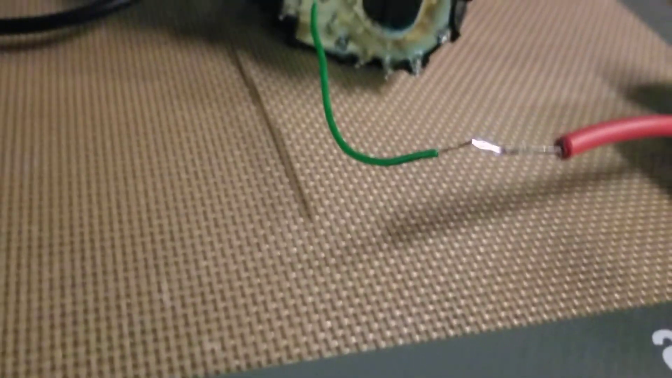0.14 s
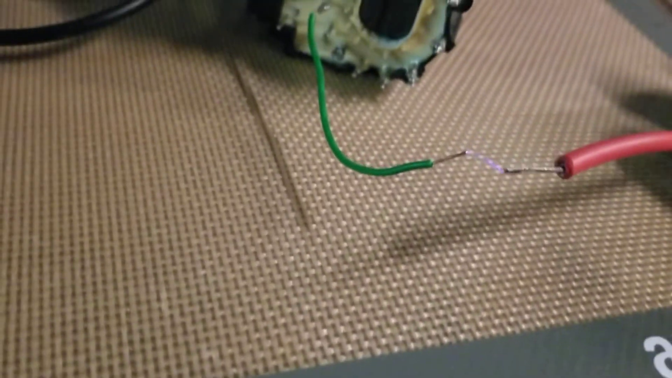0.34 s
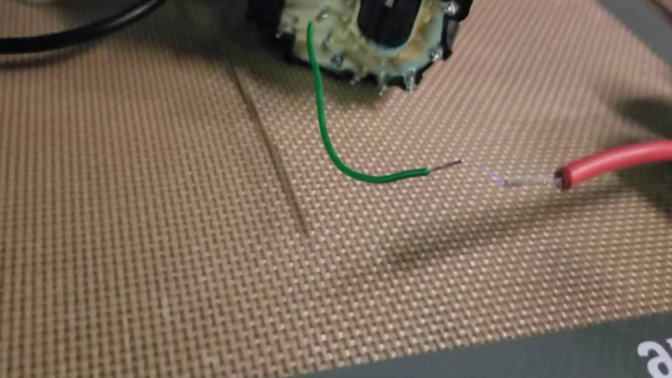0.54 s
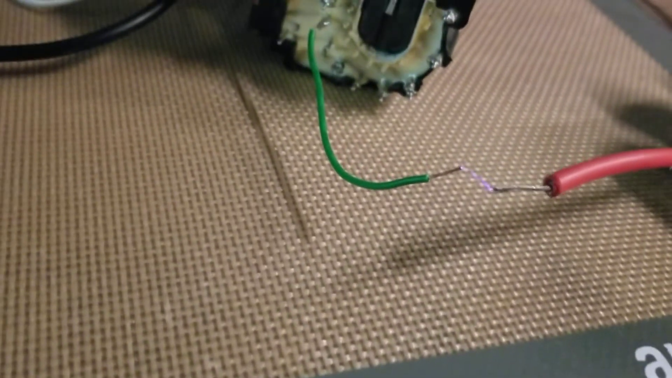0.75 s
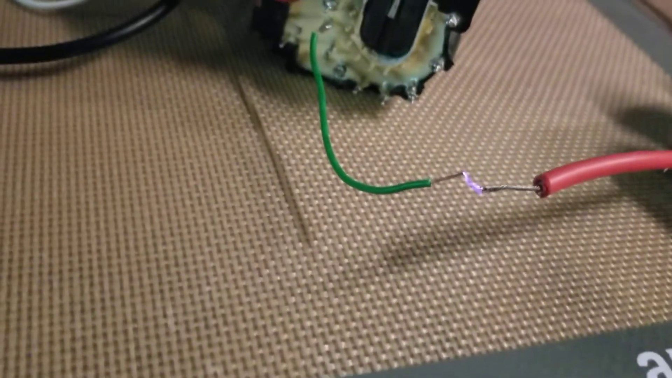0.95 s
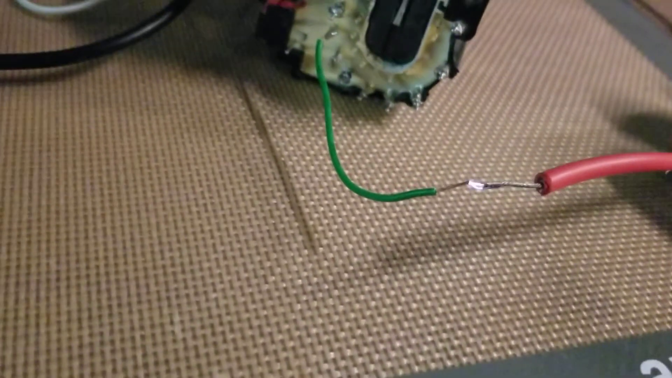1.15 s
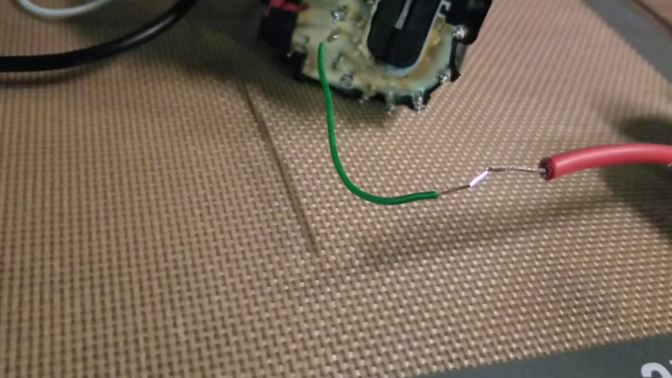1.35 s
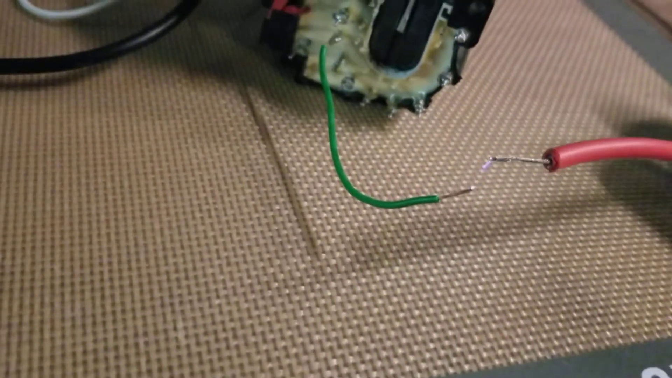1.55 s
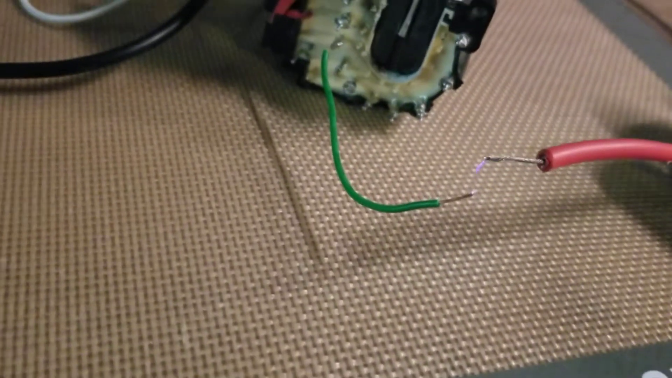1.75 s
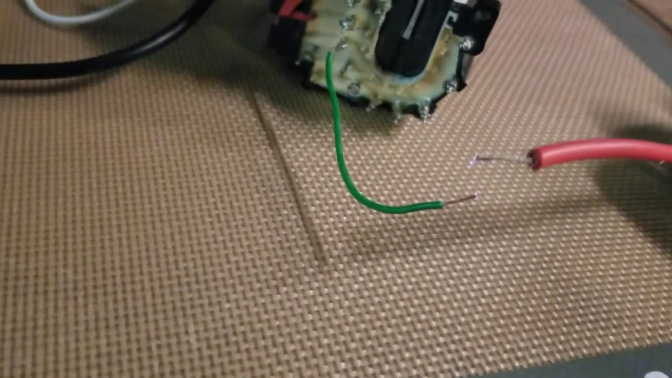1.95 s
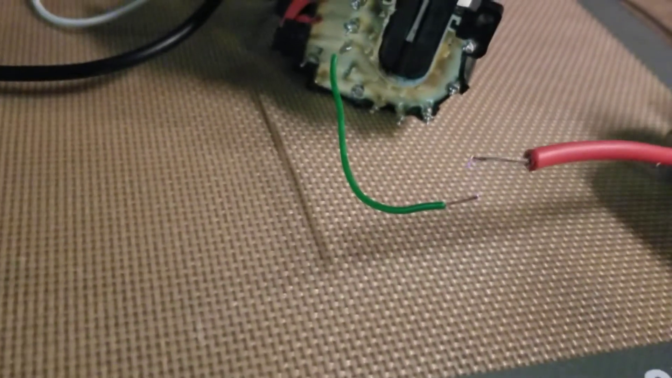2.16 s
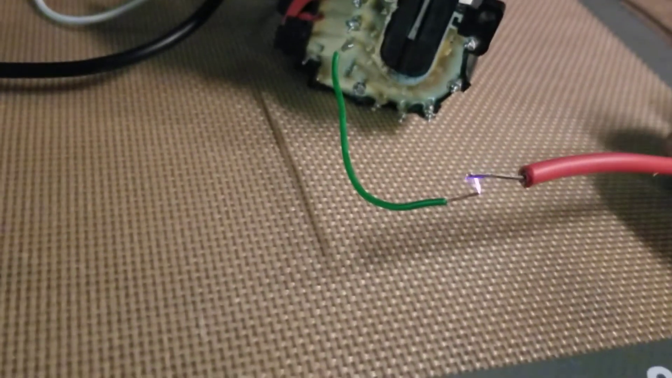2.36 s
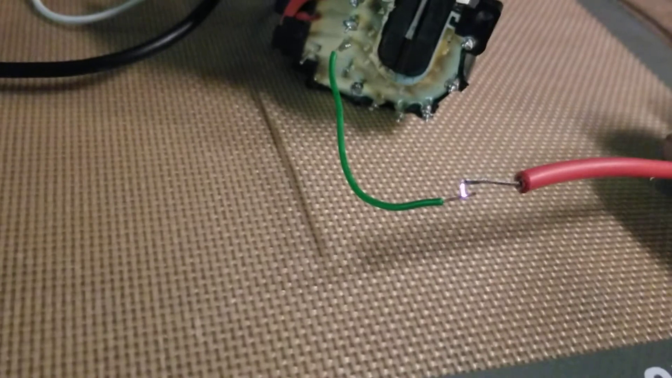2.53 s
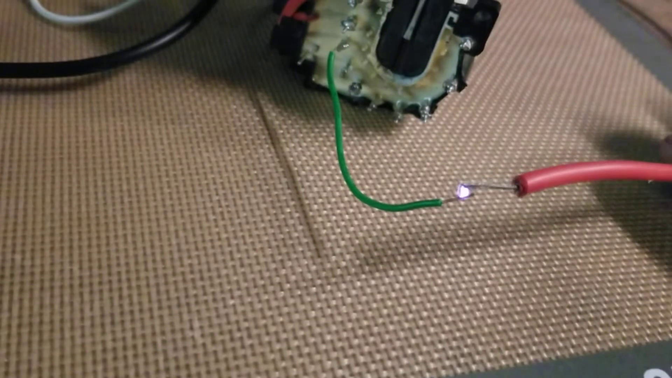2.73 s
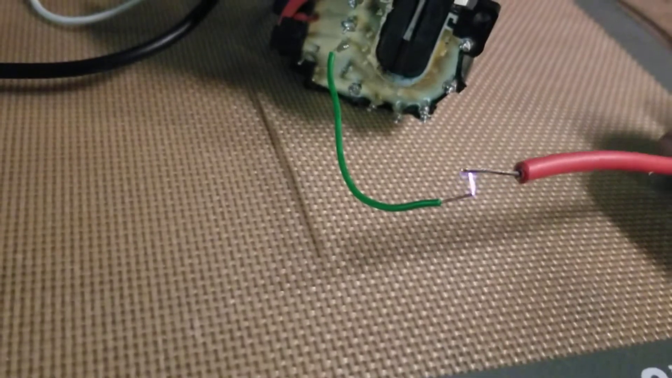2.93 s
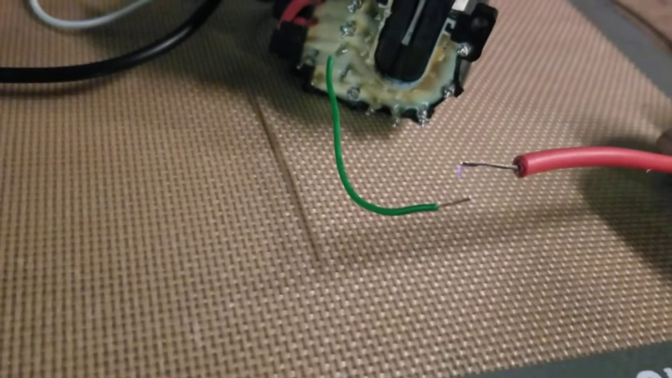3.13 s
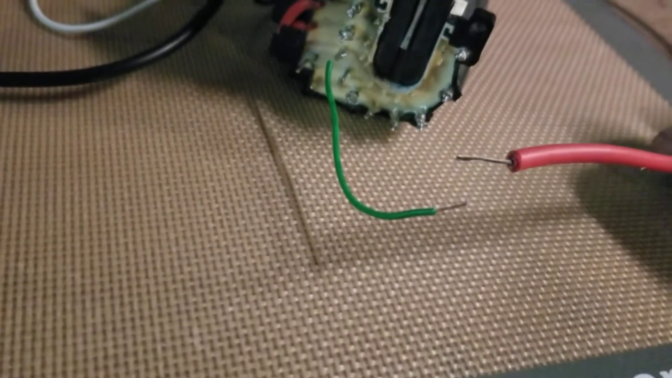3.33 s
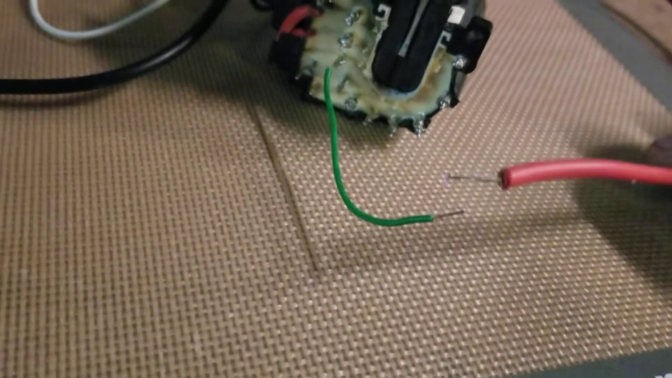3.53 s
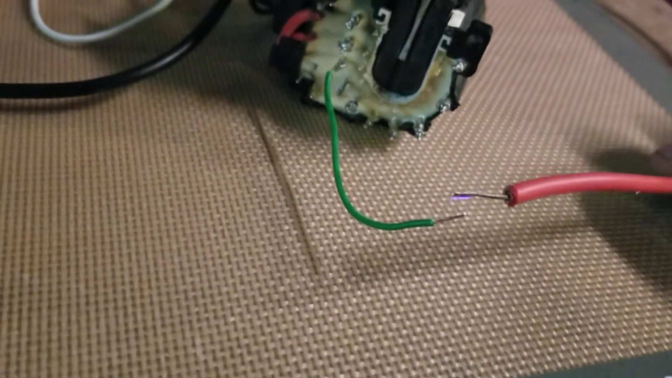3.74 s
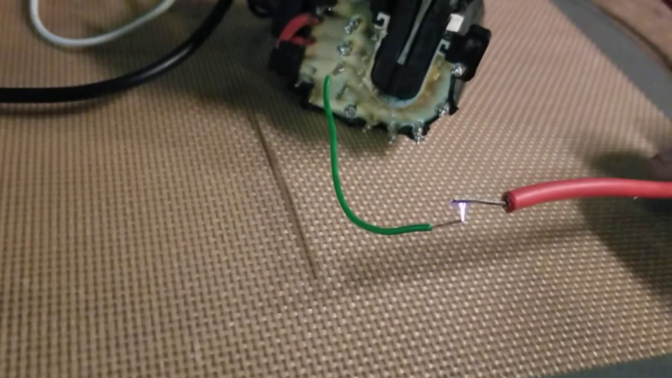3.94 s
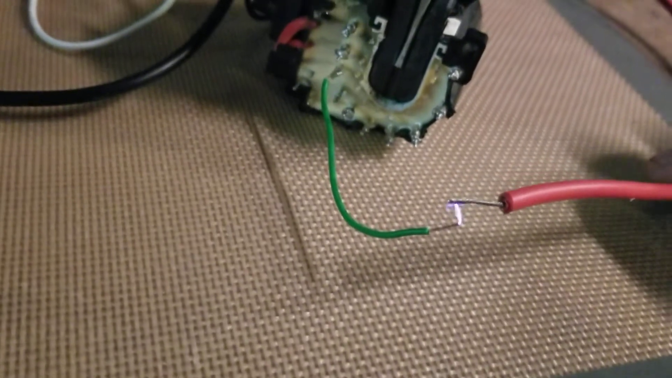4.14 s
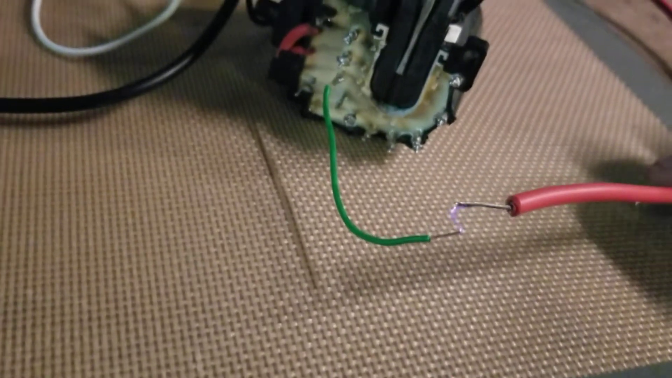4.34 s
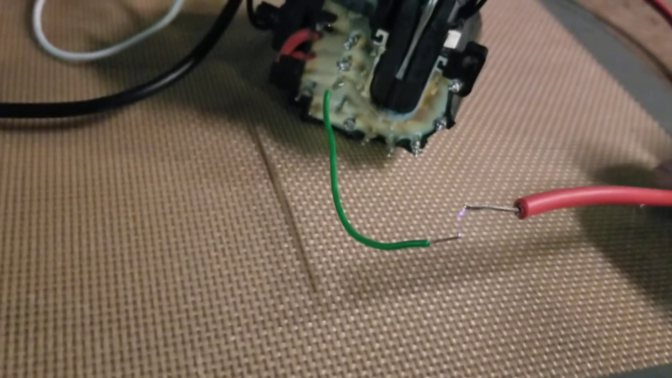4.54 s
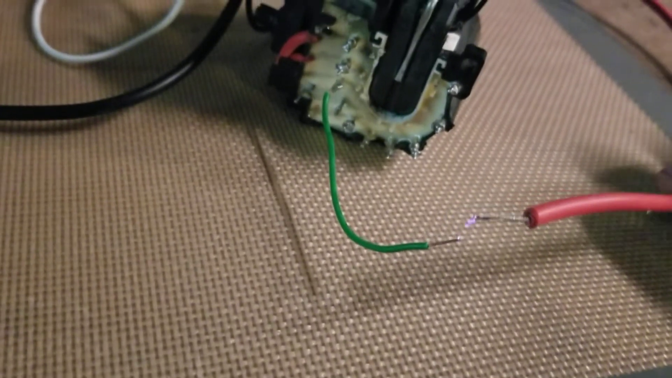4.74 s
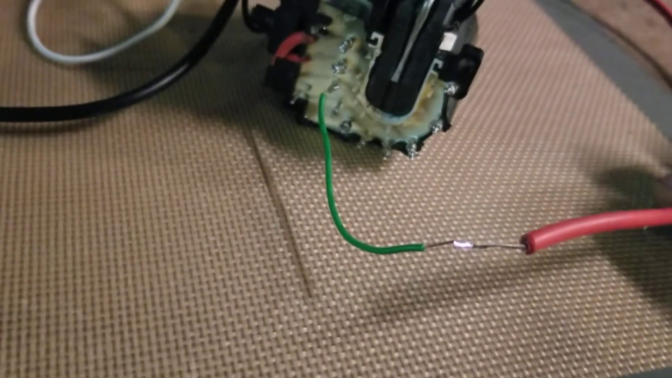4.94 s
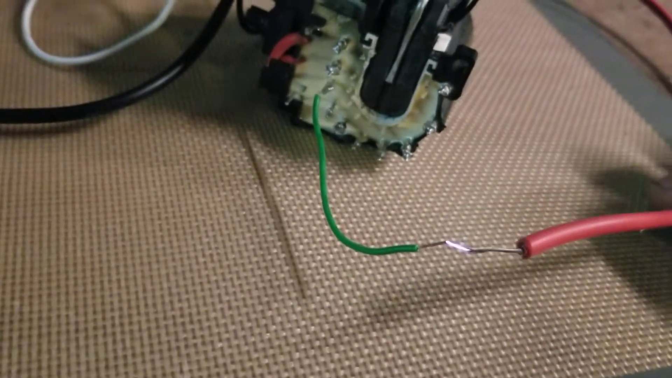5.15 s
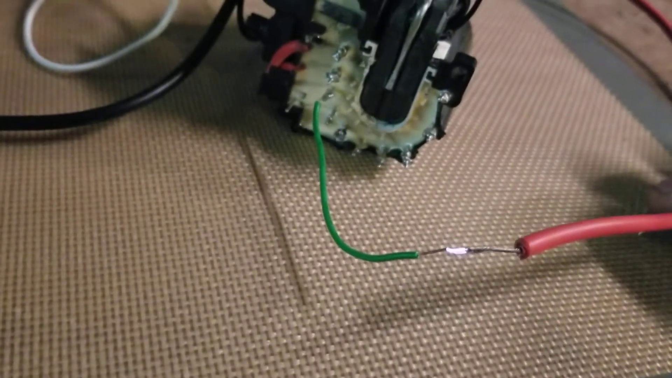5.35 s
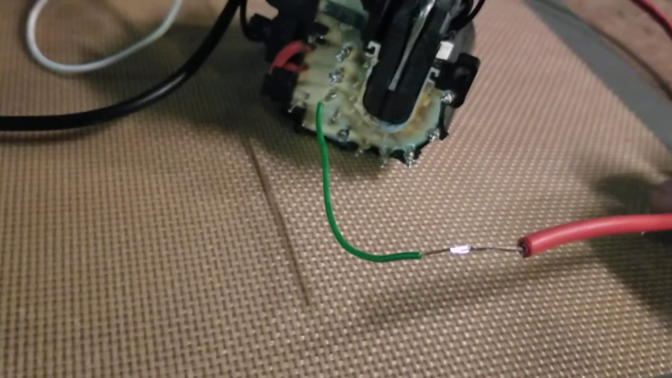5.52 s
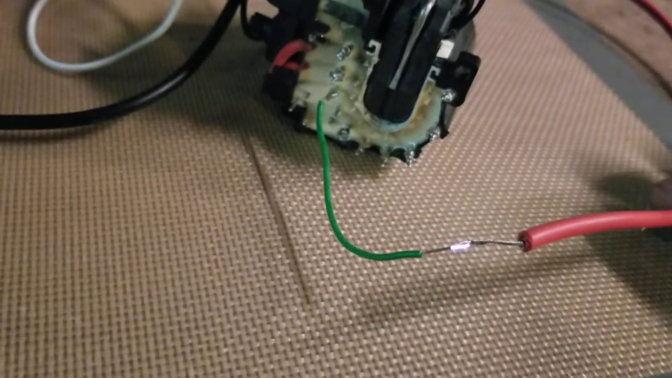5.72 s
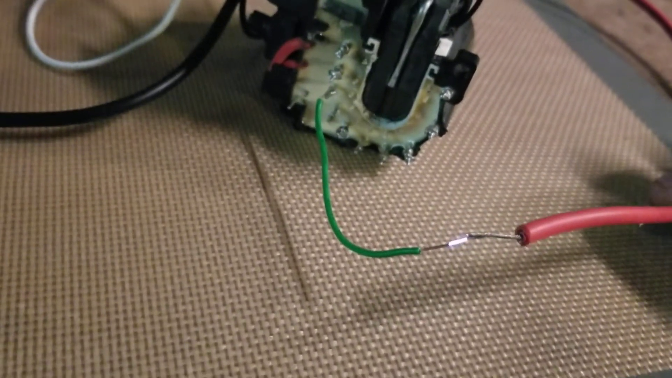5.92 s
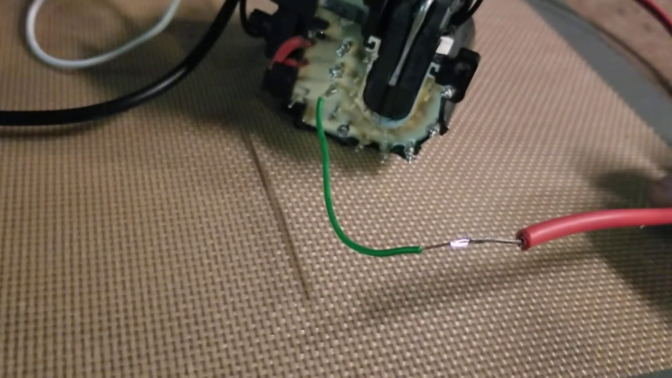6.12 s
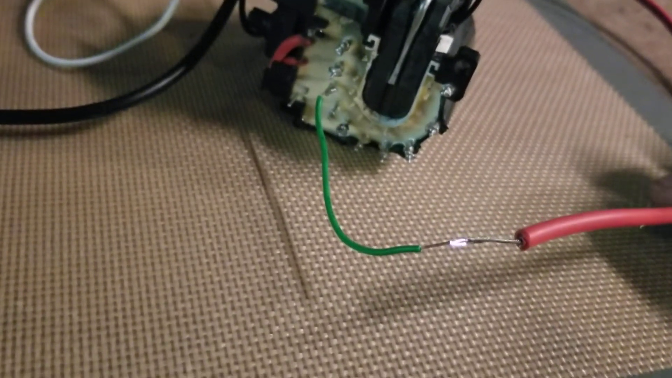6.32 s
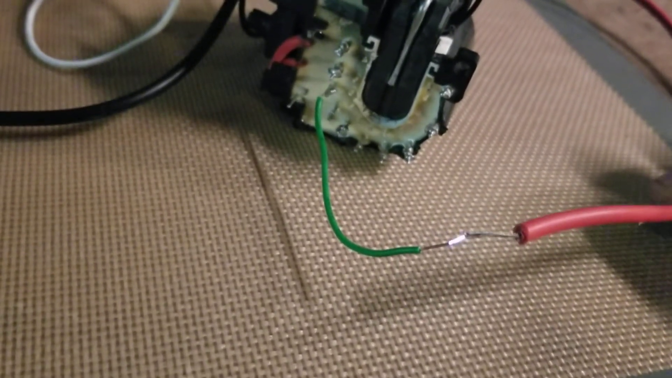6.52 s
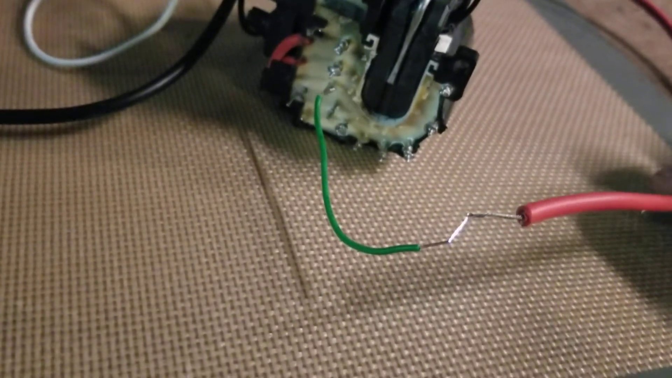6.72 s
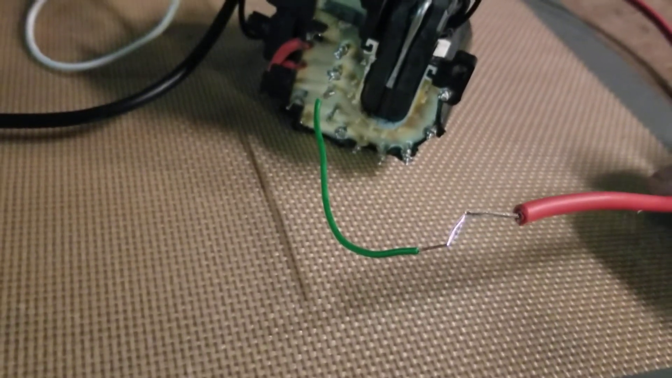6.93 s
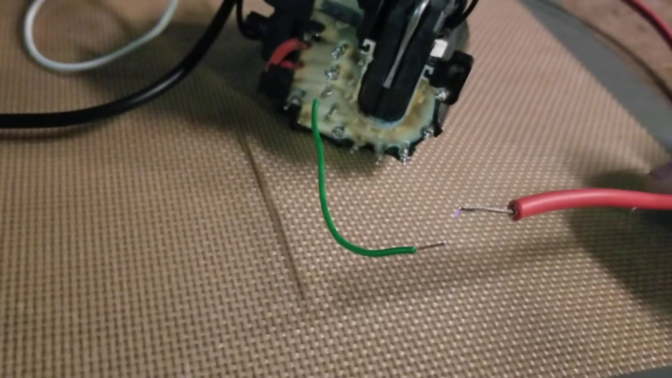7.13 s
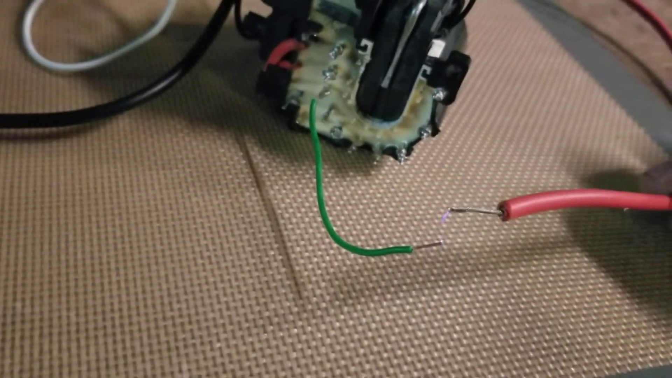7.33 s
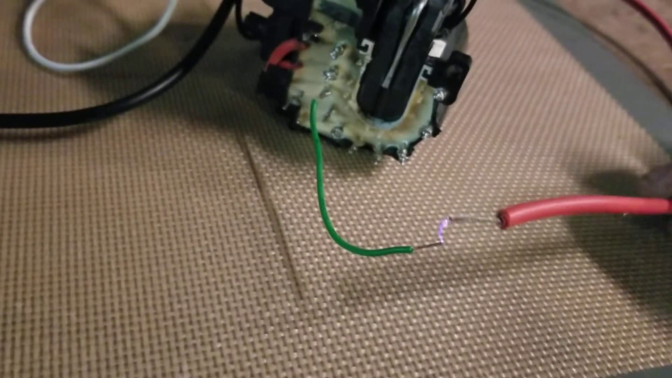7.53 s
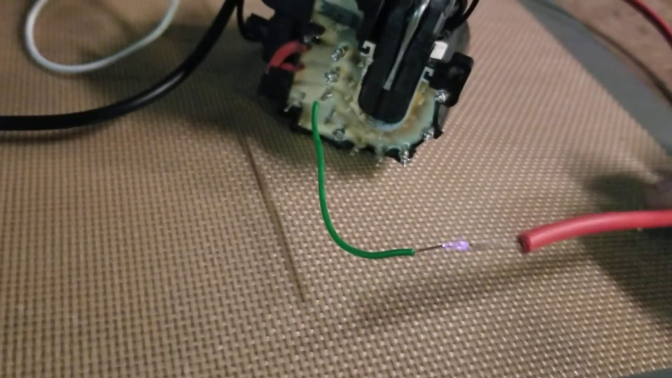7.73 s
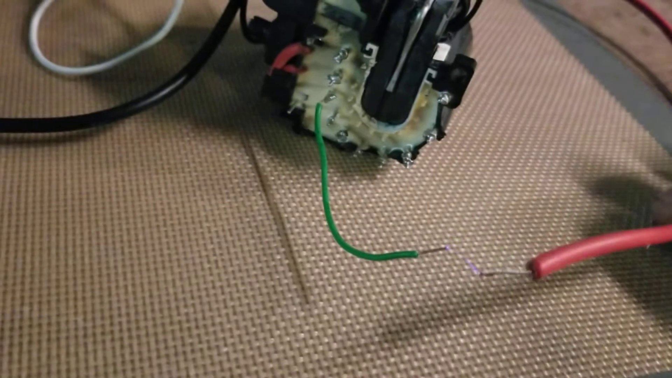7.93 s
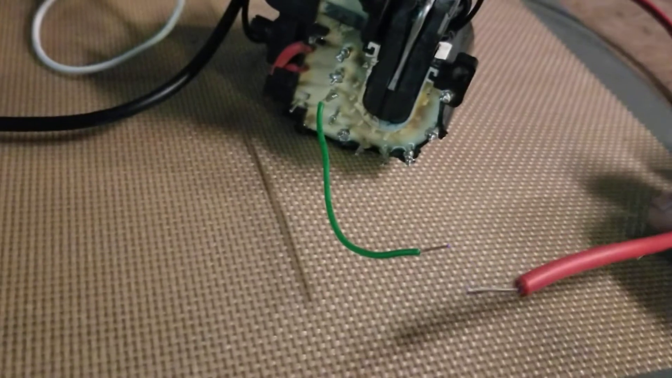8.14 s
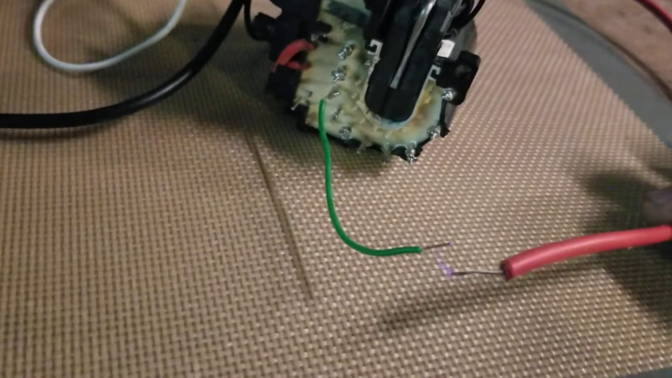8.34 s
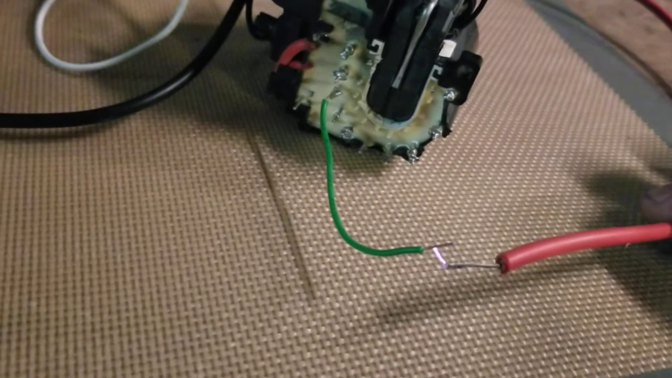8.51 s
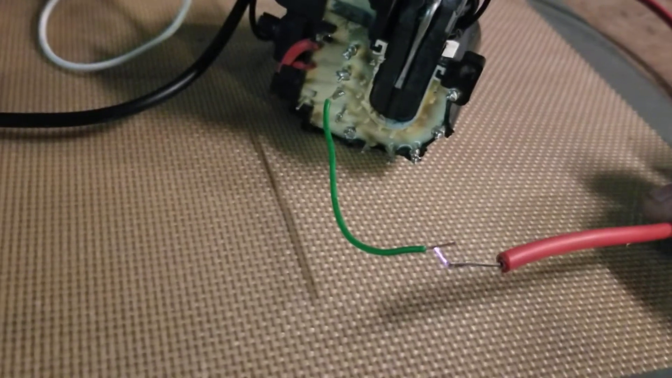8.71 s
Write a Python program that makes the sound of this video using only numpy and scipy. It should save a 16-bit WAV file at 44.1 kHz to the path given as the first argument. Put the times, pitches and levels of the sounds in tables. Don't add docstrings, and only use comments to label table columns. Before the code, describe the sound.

A small dry room with a steady low fan hum and soft airy noise throughout, heard by a close handheld stereo microphone. At 0 s several crisp sparks crackle, then a short low buzz until 0.2. Faint hiss patches fill the pause. At 1.04-1.5 a raspy buzz rises, then sinks. From 2.35 to 3.0 a buzz climbs quickly to a shrill peak, then falls and fades. Another wavering buzz runs 3.76-4.15, with a tiny snap volley at 4.3 and soft hiss. From 4.8 a long, brighter arc buzzes continuously, dropping low near 5.1, climbing by 5.5, wavering, then sinking sharply at 6.55. From 6.68 it becomes rapid separate snaps, ending around 6.97. Hiss follows, with a brief buzz at 7.55-7.68 and weak ticks. From 8.3 dull fingers rub plastic, while hiss swells and sharp sparks return in irregular volleys until the end at 8.77.

```python
import sys
import numpy as np
from scipy import signal
from scipy.fft import rfft, irfft, next_fast_len
from scipy.io import wavfile
from scipy.ndimage import uniform_filter1d, map_coordinates

SR = 44100
rng = np.random.default_rng(int(sys.argv[2]) if len(sys.argv) > 2 else 0)


def transcribe(signal):
    frames = np.atleast_2d(signal).T
    limited = np.clip(frames, -1, 1)
    pcm = np.round(limited * 32767).astype(np.int16)
    wavfile.write(sys.argv[1], SR, pcm)


def magnitude_from_level(level_db):
    exponent = np.asarray(level_db, float) / 20
    return 10 ** exponent


N = 386757

# (t/s, spark rate/Hz, level/dB)
EARLY_ARCS = [
    [(.069, 900, -34), (.08, 970, -32.5), (.12, 910, -32.5), (.204, 770, -32)],
    [(1.0425, 1010, -34), (1.06, 1050, -33), (1.08, 1480, -32.5), (1.13, 1570, -33.5), (1.21, 1970, -32.5),
     (1.235, 1500, -32.5), (1.31, 1370, -32), (1.345, 1120, -32.5), (1.385, 900, -35), (1.417, 800, -35),
     (1.455, 670, -32), (1.49, 665, -32.5), (1.526, 530, -34.5)],
    [(2.352, 1140, -32), (2.37, 1200, -33.5), (2.41, 1220, -32), (2.465, 2200, -32.5), (2.51, 1820, -33),
     (2.54, 2600, -36)],
    [(2.541, 2500, -35), (2.585, 3700, -37), (2.63, 2520, -35), (2.71, 2600, -37), (2.73, 2200, -34.5)],
    [(2.731, 1950, -33.5), (2.75, 1620, -34), (2.77, 1440, -35), (2.826, 1440, -33.5), (2.836, 1200, -33),
     (2.855, 1250, -33.5)],
    [(2.856, 1030, -32), (2.89, 770, -33), (2.97, 750, -39.5)],
    [(3.763, 920, -39.5), (3.8, 920, -37.5), (3.83, 1030, -32.5), (3.865, 810, -35.5), (3.885, 1320, -33.5),
     (3.925, 1280, -32.5), (3.99, 750, -37.5)],
    [(3.991, 690, -32.5), (4.03, 1080, -38.5), (4.065, 800, -37.5), (4.115, 1080, -37.5),
     (4.156, 780, -35.5)],
]
LATER_ARCS = [
    [(4.808, 639.7, -36.5), (4.86, 734.4, -33.5), (4.93, 776, -34), (4.98, 767, -34), (5.035, 662.5, -34.5),
     (5.06, 538, -35)],
    [(5.061, 530.4, -36.5), (5.09, 482, -38.5), (5.17, 496, -36.5)],
    [(5.171, 682.4, -39), (5.19, 733.6, -37.5), (5.215, 688.6, -35.5), (5.25, 758, -34.5),
     (5.32, 1192, -34), (5.345, 1195, -34.5), (5.4, 1003, -34.5), (5.453, 1261, -34.5), (5.53, 1449, -35.5)],
    [(5.531, 1447, -34.5), (5.575, 1626, -34.5), (5.62, 1444, -35)],
    [(5.621, 1436, -34), (5.72, 1451, -35), (5.76, 1320, -34.5), (5.79, 1497, -37), (5.81, 1287, -35)],
    [(5.811, 981, -42), (5.83, 1010, -35), (5.95, 870, -35.5), (6.07, 959.5, -36), (6.16, 760.4, -36),
     (6.3, 1130, -36), (6.385, 939, -36), (6.45, 1461, -35), (6.54, 1295, -36)],
    [(6.541, 1299, -34), (6.575, 446, -39.5), (6.63, 389.7, -38), (6.677, 330, -37.5)],
    [(7.5515, 600, -35.5), (7.575, 719, -36), (7.6, 1090, -34.5), (7.625, 760, -35.5), (7.648, 1050, -36)],
    [(7.651, 347.5, -40), (7.668, 603.5, -37.5), (7.682, 599.5, -43)],
    [(8.4785, 680, -36), (8.488, 720, -34.5), (8.4975, 690, -36)],
    [(8.7368, 720, -35), (8.75, 790, -32), (8.77, 860, -33)],
]
# (t/s, facing/0-1)
FACING = [(0, 0.13), (1, 0.3), (1.5, 0.68), (2.4, 0.41), (3, 0.6), (3.8, 0.71), (4.6, 1), (6, 0.9),
          (7, 0.97), (7.7, 0.88), (8.2, 0.68), (8.77, 0.3)]


def unit(x):
    return x / np.sqrt(np.mean(x ** 2) + 1e-20)


def along(points, hz):
    f, v = np.transpose(points)
    return np.interp(np.log(hz + 1), np.log(f + 1), v)


def curves(rows):
    s, *columns = np.transpose(rows)
    return [np.interp(np.arange(N) / SR, s, column) for column in columns]


def gate(tables):
    t = np.arange(N) / SR
    return sum((t >= rows[0][0]) & (t <= rows[-1][0]) for rows in tables) > 0


def filtered(x, response):
    m = next_fast_len(N + SR // 2)
    return irfft(rfft(x, m) * response(np.fft.rfftfreq(m, 1 / SR)), m)[..., :N]


def wobble(rate):
    knots = rng.standard_normal(int(N * rate / SR) + 4)
    return map_coordinates(knots, [np.arange(N) * rate / SR])


def impulses(at, sizes):
    k = np.floor(at)[:, None] + np.arange(-7, 9)
    d = k - at[:, None]
    taps = sizes[:, None] * np.sinc(d) * np.cos(np.pi * d / 16) ** 2
    return np.bincount(np.clip(k, 0, N).astype(int).ravel(), taps.ravel(), N + 1)[:N]


def lone_sparks(jitter):
    # (t/s, peak level/dB, sparks in the volley)
    sparks = [(.0003, -24, 1), (.0014, -20, 2), (.0048, -21, 1), (.0058, -12, 1), (.0098, -21, 2),
              (0.015, -23, 1), (0.0172, -20, 1), (.0273, -16, 3), (0.0385, -20, 1), (0.0472, -18, 1),
              (.0499, -16, 1), (.0524, -17, 1), (0.056, -17, 1), (.0578, -22, 1), (4.2983, -15.5, 4),
              (6.9324, -14, 1), (6.9392, -17, 1), (6.9534, -13.5, 1), (6.958, -16, 1), (6.9654, -13, 1),
              (6.9725, -15, 1), (7.5484, -14.5, 1), (7.7445, -21, 1), (7.763, -20, 1), (8.4673, -18, 1),
              (8.4698, -17, 1), (8.4731, -19, 1), (8.4772, -16, 1), (8.5, -15, 1), (8.5009, -16, 1),
              (8.5022, -17, 1), (8.5099, -20, 1), (8.5319, -17, 1), (8.54, -21, 1), (8.5706, -20, 1),
              (8.5735, -23, 1), (8.5867, -22, 1), (8.6267, -13.5, 1), (8.6356, -15.5, 1), (8.6592, -20, 1),
              (8.6842, -15, 1), (8.6991, -17, 2), (8.7025, -25, 1), (8.7041, -16, 2), (8.7184, -15, 2),
              (8.7274, -20, 1), (8.73, -14, 1), (8.7307, -15, 1), (8.7335, -16, 1), (8.7359, -16, 1)]
    # (t/s, peak level/dB)
    thinning = [(6.6802, -13.0), (6.6842, -14.3), (6.6874, -16.1), (6.6896, -14.3), (6.6948, -15.0),
                (6.7007, -14.5), (6.7053, -14.2), (6.7098, -12.4), (6.7132, -13.7), (6.7154, -22.5),
                (6.7193, -13.4), (6.7225, -13.0), (6.7268, -15.3), (6.73, -13.5), (6.7329, -14.4),
                (6.7371, -12.3), (6.7409, -14.7), (6.744, -13.0), (6.7478, -13.8), (6.7515, -14.8),
                (6.7547, -12.3), (6.7582, -14.8), (6.762, -13.0), (6.7663, -14.5), (6.7695, -12.5),
                (6.7744, -14.2), (6.779, -11.9), (6.7819, -15.8), (6.7853, -15.1), (6.7905, -13.2),
                (6.7943, -12.7), (6.7981, -13.4), (6.8013, -15.5), (6.8053, -15.2), (6.8079, -16.0),
                (6.8134, -15.0), (6.8196, -13.2), (6.8234, -14.2), (6.8274, -17.5), (6.8332, -13.3),
                (6.8355, -15.5), (6.8383, -17.3), (6.8443, -10.9), (6.8492, -15.2), (6.8522, -15.3),
                (6.856, -14.6), (6.8611, -15.0), (6.8634, -16.6), (6.8679, -14.7), (6.8725, -14.2),
                (6.8771, -16.1),
                (6.8829, -13.5),
        (6.8878, -12.0),
        (6.8929, -12.3),
        (6.8961, -13.7),
        (6.9005, -13.1),
        (6.9065, -13.0),
        (6.9096, -16.2),
        (6.9127, -13.3),
        (6.9169, -12.5),
        (6.9236, -13.2),
    ]
    recharge_s = .0013
    volleys = [(s + k * recharge_s, db) for s, db, count in sparks for k in range(count)]
    s, peak_db = np.transpose(volleys + thinning)
    close = np.diff(s, prepend=-1) < 1.1 * recharge_s
    return s + recharge_s / 8 * jitter[-len(s):] * close, peak_db


def spark_train():
    unsteady = [.06, .065, .065, .09, .08, .075, .04, .045, .055, .03, .05, .012, .12, .1, .2, .25, .11, .3,
                .05, .08]
    arcs = EARLY_ARCS + LATER_ARCS
    rate, level_db = curves(np.vstack(arcs))
    scatter = sum(share * gate([rows]) for rows, share in zip(arcs, unsteady))
    draw = rng.standard_normal((12000, 4))
    phase = np.cumsum(rate / SR)

    regular = np.interp(np.arange(len(draw)), phase, np.arange(N)).astype(int)
    charge = np.clip(1 + (1.2 * scatter[regular] + .013) * draw[:, 0], .4, 2)
    at = np.interp(np.cumsum(charge), phase, np.arange(N))
    i = at.astype(int)
    loose = np.clip(scatter[i] / .04, .35, 1)
    at = at + 1.8 * loose * rng.standard_normal(len(at))

    sizes = magnitude_from_level(level_db[i] + 1.5 * loose * draw[:, 1]) * np.sqrt(SR / rate[i] * charge)
    sizes = sizes * gate(arcs)[i] * (i < N - 1)
    s, peak_db = lone_sparks(draw[:, 0])
    sign = np.sign(rng.standard_normal(len(draw)))
    far = impulses(at + .3 * draw[:, 2], sizes * magnitude_from_level(2 * draw[:, 3]))
    lone_size = magnitude_from_level(peak_db + 0.6)
    lone = impulses(s * SR, lone_size)
    stray = impulses(s * SR, lone_size * sign[:len(s)])
    return np.array([impulses(at, sizes) + lone, far + lone, impulses(at, sizes * sign) + stray])


def corona():
    # (start/s, crest/s, end/s)
    patches = [(0, .02, .07), (.21, .24, .3), (.28, .434, .46), (.45, .51, .525), (.67, .704, .76),
               (.74, .89, .93), (1.66, 1.68, 1.78), (1.97, 1.978, 1.99), (2.05, 2.09, 2.13),
               (2.17, 2.21, 2.35), (2.25, 2.34, 2.35), (2.98, 3, 3.1), (4.21, 4.28, 4.3),
               (4.3, 4.36, 4.415), (4.49, 4.63, 4.68), (7.22, 7.33, 7.36), (7.42, 7.46, 7.55),
               (7.47, 7.54, 7.55), (7.68, 7.7, 7.75), (7.76, 7.79, 7.89), (8.148, 8.17, 8.21),
               (8.288, 8.31, 8.45), (8.36, 8.462, 8.47), (8.5, 8.55, 8.66), (8.58, 8.7, 8.73)]
    crest_db = [-42, -60, -61.5, -69, -63, -62.5, -67, -76, -60, -61.5, -64, -67, -57, -59, -64.5, -81,
                -64.5, -77, -65, -61.5, -74, -60.5, -52.5, -49, -48]
    edge_db = -12
    t = np.arange(N) / SR
    swell = np.zeros(N)
    for (start, crest, end), db in zip(patches, crest_db):
        shape_db = np.interp(t, [start, crest, end], [edge_db, 0, edge_db])
        swell += magnitude_from_level(db + shape_db) * (t > start) * (t < end)
    level = uniform_filter1d(swell, size=400) * magnitude_from_level(0.5 * wobble(42))
    ticks = rng.standard_normal(N) * magnitude_from_level(6.0 * rng.standard_normal(N))
    own = rng.standard_normal((2, N)) * [[0], [.8]]
    return unit(ticks + own) * level


def loosened(right, stray):
    # (f/Hz, share/0-1)
    loose = [(2300, .2), (3200, .95), (3750, .9), (4050, .82), (4400, .75), (5100, .8), (5800, .45),
             (7400, .25), (8900, .65), (10000, .55), (13300, .7), (15000, .1)]
    shares = lambda hz: np.sqrt([1 - along(loose, hz) ** 2, along(loose, hz) ** 2])
    return filtered(np.array([right, stray]), shares).sum(axis=0)


def bench(hz, side):
    # (delay/s, left level/dB, right level/dB)
    bounces = [
        (-.0003, -11, -12),
        (-.00015, -6, -5),
        (.00013, -6, -4),
        (.00037, -10, -12),
        (.0011, -25, -24),
    ]
    paths = 1 + sum(magnitude_from_level(e[1 + side]) * np.exp(-2j * np.pi * hz * e[0]) for e in bounces)
    return paths / np.sqrt(uniform_filter1d(np.abs(paths) ** 2, size=12000))


def at_ports(left, right):
    # (f/Hz, level/dB)
    snap_left = [(1000, -15), (1600, -10.5), (2300, -9), (3000, -21.5), (3500, -15), (4400, -13),
                 (5500, -14), (6500, -15.5), (7800, -7.5), (9100, -14), (10500, -7), (12000, -2),
                 (13300, 0.5), (14000, 1.5), (15100, -4.5), (15700, 4.5)]
    snap_right = [(1000, -34), (1600, -29), (2300, -35), (3400, -27.5), (4300, -27), (5050, -28),
                  (5500, -24), (6500, -20), (7800, -18), (9100, -21.5), (10000, -23), (10900, -24),
                  (11500, -29), (12100, -20), (12600, -24), (13300, -22), (13900, -24), (14600, -20),
                  (15100, -20), (15700, -18)]
    # (f/Hz, gain/dB)
    away_left = [(850, 3.5), (1300, -1), (2500, 0), (3200, 0), (4500, 3.5), (7500, 2), (9700, 4),
                 (11500, -4), (14000, -4), (15700, 0)]
    away_right = [(2500, -3.5), (4000, 0.5), (5000, -9.5), (7200, 6), (9000, -4), (11500, -0.5),
                  (13500, 1.5), (15700, 3)]
    # (f/Hz, phase/rad)
    lead = [(1200, -.7), (2500, .4), (3500, .9), (4050, 3.1), (4700, 1.2), (5300, -.3), (6400, -.4),
            (7200, -2.4), (8500, -2.2), (10000, -4.9), (11700, -4.7), (12200, -3.3), (12700, -4),
            (13300, -2.6), (13800, -4.6), (14200, -5.1), (15700, -5.1)]
    lead_away = [(1200, -.5), (2500, .2), (3500, 1.4), (3950, 3.1), (4300, 3.4), (5200, 3), (5700, -.3),
                 (6300, -1.7), (7200, -3.1), (7700, -3.3), (8200, -2.6), (8700, -4.3), (10500, -4.8),
                 (12000, -4.3), (13000, -3.5), (14200, -4.5), (15700, -4.9)]
    low_end = [(250, -52), (600, -25.0)]
    case = lambda hz: 1 + 1.2j * hz * 120 / (1480 ** 2 - hz ** 2 + 1j * hz * 120)
    square = np.clip((curves(FACING)[0] - .5) / .35, 0, 1)
    ports = []
    for side, (train, colour, away) in enumerate([(left, snap_left, away_left), (right, snap_right, away_right)]):
        def response(hz):
            facing_pose = np.exp(1j * side * along(lead, hz))
            turned_pose = magnitude_from_level(along(away, hz)) * np.exp(1j * side * along(lead_away, hz))
            common = -magnitude_from_level(along(low_end + colour, hz)) * bench(hz, side) * case(hz)
            return common * np.array([facing_pose, turned_pose])
        facing, turned = filtered(train, response)
        ports.append(square * facing + (1 - square) * turned)
    return np.array(ports)


def housing(x):
    # (f/Hz, width/Hz, gain turned away/dB, added gain when facing/dB)
    shadows = [(3050, 200, -1, -1), (3590, 200, -2, -3), (5250, 300, -5, 2), (7350, 600, -10, 8.5),
               (12350, 500, 1, 5), (13500, 1500, -8, 5.5), (13950, 500, -2, -3), (14950, 900, 6, 0)]
    # (t/s, f/Hz, depth/dB)
    notch = [(0, 3800, -9), (1.1, 3620, -5), (1.17, 4000, -15), (1.3, 3900, -15), (1.36, 3700, -4),
             (1.5, 3650, -6), (2.4, 4000, -5), (2.85, 4050, -9), (3.9, 3500, -5), (4.84, 4000, -8),
             (4.93, 3550, -4), (5.08, 4050, -8), (5.22, 3650, -1), (5.34, 4080, -4), (5.58, 3600, -4),
             (5.74, 4080, -5), (5.85, 3600, -2), (6.22, 4000, -7), (6.35, 3700, -1), (6.5, 4050, -4),
             (6.59, 3620, -5), (6.66, 3580, -3), (6.95, 3580, -3), (8.77, 3800, -4)]
    # (t/s, gain/dB)
    lift = [
        (0, 2),
        (1.2, 4),
        (1.4, -4),
        (2.6, 2.5),
        (4, -2.5),
        (5, 2),
        (7.7, -1),
        (8.3, 12),
        (8.77, 6.5),
    ]
    flicker = .55
    hz, t, z = signal.stft(x, SR, nperseg=512)
    at = lambda curve: curve[np.minimum((t * SR).astype(int), N - 1)]
    bell = lambda centre_hz, width_hz: np.exp(-((hz[:, None] - centre_hz) / width_hz * 2) ** 2)
    notch_hz, depth_db = curves(notch)
    gain_db = at(depth_db * (1 + flicker * wobble(16))) * bell(at(notch_hz), 240)
    gain_db = gain_db + at(curves(lift)[0]) * bell(12740, 2200)
    for centre_hz, width_hz, away_db, facing_db in shadows:
        dance = 1 + flicker * wobble(18) * (centre_hz < 8000)
        shadow_db = (away_db + facing_db * curves(FACING)[0]) * dance
        gain_db = gain_db + at(shadow_db) * bell(centre_hz, width_hz)
    return signal.istft(z * magnitude_from_level(gain_db), SR, nperseg=512)[1][:, :N]


def arc():
    facing = curves(FACING)[0]
    top_db = -13.5 + 12.5 * facing
    pan_db = 7 + 3 * facing
    body_db = -19.5 + 11 * facing
    arcs = EARLY_ARCS + LATER_ARCS
    rate = curves(np.vstack(arcs))[0]
    top_db = top_db + 0.5 * np.log2(rate / 1000) * gate(arcs)

    left, right, stray = spark_train() + corona()[[0, 1, 1]]
    snap = at_ports(left, loosened(right, stray))
    ear = np.array([[.5], [-.5]])
    snap = housing(snap * magnitude_from_level(16.0 + ear * (pan_db - 17.5)))
    body = filtered(snap, lambda hz: 1 / (1 + (hz / 8800) ** 12) - 1 / (1 + (hz / 4800) ** 12))
    top = filtered(snap, lambda hz: 1 - 1 / (1 + (hz / 14000) ** 30))
    return snap + body * (magnitude_from_level(body_db + 10.5) - 1) + top * (magnitude_from_level(1.03 * (top_db + 3.5)) - 1)


def room(x):
    # (f/Hz, fade time/s)
    walls = [(1000, 0.034), (4000, 0.076), (10000, 0.022), (16000, 0.056)]
    hz, t, z = signal.stft(rng.standard_normal((2, 2, SR // 3)), SR, nperseg=128)
    fade = magnitude_from_level(-60 * t / along(walls, hz)[:, None])
    tails = signal.istft(z * fade, SR, nperseg=128)[1]
    tails = np.pad(tails, ((0, 0), (0, 0), (70, 0))) / np.linalg.norm(tails[0, 0])
    drift = 1.2 * wobble(2.5)
    turning = x * np.array([np.cos(drift), np.sin(drift)])[:, None]
    return signal.fftconvolve(turning, tails, axes=2)[..., :N].sum(axis=0)


def fan_and_air():
    # (f/Hz, level per Hz/dB)
    room_air = [(15, -43), (25, -6), (59, 0.5), (145, -10), (185, -8), (229, -0.5), (335, -6.5), (384, -2),
                (516, -7), (1230, -15.5), (1840, -12), (2400, -20.5), (3350, -25.5), (3750, -29),
                (6920, -35), (9570, -48.5), (16000, -41)]
    # (f/Hz, likeness/-1 to 1)
    air_alike = [(60, 0.94), (130, 0.95), (290, 0.8), (640, 0.21), (1410, -0.3), (3100, -0.69),
                 (6820, -0.0098), (15000, 0.096)]
    # (f/Hz, difference/dB)
    air_balance = [(60, 5), (110, 7), (200, 5.5), (380, 4.5), (700, 6), (1290, 11), (2380, 8), (4400, 7.5),
                   (8120, 5), (15000, 9)]
    # (f/Hz, width/Hz)
    drone = [(68, 14), (140, 16.7)]
    # (t/s, rise over the steady level/dB)
    swell_tables = [
        [(2.03, 10), (2.69, -1), (3.49, 4.5), (4.42, 9.5), (5.13, 4), (5.67, 9.5), (8.43, 5.5), (8.77, 1)],
        [(.14, 4), (.5, 5.5), (1.2, 7), (2.05, 2), (2.56, 1), (2.88, 4), (4.42, 2.5), (5.1, 10), (7.5, 6),
         (8.15, 7.5), (8.4, 7), (8.77, 3)],
    ]
    # (f/Hz, wander/Hz, rms level/dB)
    fan_tones = [(158.4, 5.61, -62), (228.4, 4.78, -56), (299.8, 20.3, -60), (384, 3.34, -55),
                 (458, 5.77, -72), (625, 20.04, -66.5)]
    swell_s, drone_db = (0.13, 0.054), (-58, -56.5)
    a, b = rng.standard_normal((2, N))
    turn = lambda hz: np.arccos(np.clip(along(air_alike, hz), 0, 1)) / 2
    mid = filtered(a, lambda hz: magnitude_from_level(along(room_air, hz)) * np.cos(turn(hz)))
    side = filtered(b, lambda hz: magnitude_from_level(along(room_air, hz)) * np.sin(turn(hz)))
    air = magnitude_from_level(-50.0) * unit(np.array([mid + side, mid - side]))
    t = np.arange(N) / SR
    for (centre_hz, width_hz), swells, width_s, steady_db in zip(drone, swell_tables, swell_s, drone_db):
        swell_db = steady_db + sum(db * np.exp(-((t - s) / width_s) ** 2 / 2) for s, db in swells)
        tone = filtered(rng.standard_normal(N), lambda hz: 1 / (1 + ((hz - centre_hz) / width_hz * 2) ** 2))
        air = air + magnitude_from_level(swell_db) * unit(tone)
    for centre_hz, wander_hz, db in fan_tones:
        pitch = centre_hz + wander_hz * wobble(25)
        air = air + magnitude_from_level(db + 3.0 + 1.15 * wobble(14)) * np.sin(2 * np.pi * np.cumsum(pitch) / SR)
    ear = np.array([[.5], [-.5]])
    delay_s = 0.00017
    return filtered(air, lambda hz: magnitude_from_level(ear * along(air_balance, hz)) * np.exp(2j * np.pi * hz * ear * delay_s))


def rub():
    # (t/s, level/dB)
    slide = [
        (8.3, -69),
        (8.345, -61),
        (8.47, -52),
        (8.6, -50),
        (8.77, -50),
    ]
    # (f/Hz, level per Hz/dB)
    sleeve = [(700, -12), (1500, 1.5), (2100, -0.5), (3700, -6.5), (5000, -5.5), (7200, -18), (8300, -32)]
    grains = rng.standard_normal((2, N)) * magnitude_from_level(2.7 * rng.standard_normal(N) + 2.46 * wobble(60))
    level = magnitude_from_level(curves(slide)[0] + np.array([[3], [-3]])) * gate([slide])
    return level * unit(filtered(grains, lambda hz: magnitude_from_level(along(sleeve, hz))))


def scene():
    sparks = arc()
    return sparks + magnitude_from_level(-5.5) * room(sparks) + fan_and_air() + rub()


def without_weak_bands(x, far_db, near_db):
    z = signal.stft([x[0] + x[1], x[0] - x[1]], nperseg=2048, noverlap=1024)[2]
    bands = (np.abs(z[:, :1024]) ** 2).reshape(2, 128, 8, -1).sum(axis=2)
    bands = bands ** .6 * uniform_filter1d(bands, size=4, axis=2) ** .4
    loudest = bands.sum(axis=0)[70:].max(axis=0)
    around = np.exp(uniform_filter1d(np.log(bands + 1e-30), size=15, axis=1))
    weak = (bands < loudest * magnitude_from_level(2 * far_db)) | (bands < around * magnitude_from_level(2 * near_db))
    weak[:, :17] = weak[:, 56:] = False
    keep = np.pad(np.repeat(~weak, 8, axis=1), ((0, 0), (0, 1), (0, 0)))
    mid, side = signal.istft(z * keep, nperseg=2048, noverlap=1024)[1][:, :N] / 2
    return np.array([mid + side, mid - side])


def band_limit(x):
    return signal.sosfilt(signal.butter(12, 17130, fs=SR, output="sos"), x)


def record(dry):
    edge = lambda hz: np.clip((15800 - hz) / 120, 0, 1) ** 2 / (1 + (40 / (hz + 1)) ** 4.5)
    mix = without_weak_bands(filtered(dry, edge), far_db=-27.5, near_db=-3.9)
    return band_limit(mix)


dry = scene()
out = record(dry)
transcribe(out)
```